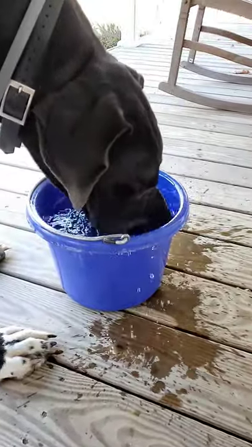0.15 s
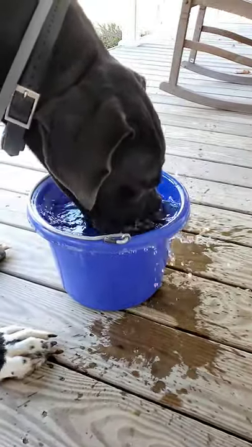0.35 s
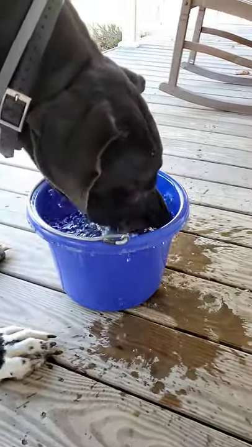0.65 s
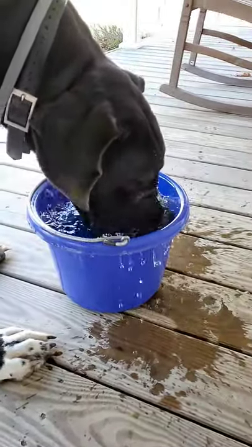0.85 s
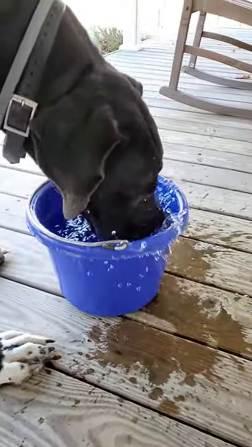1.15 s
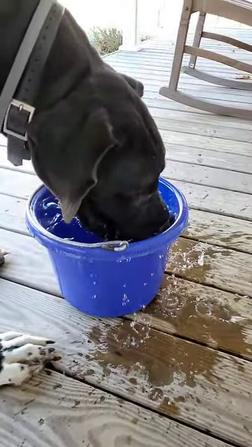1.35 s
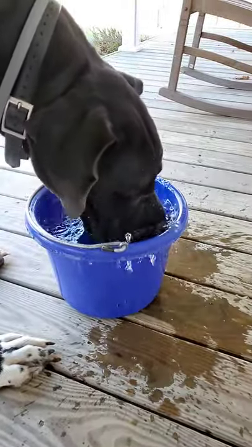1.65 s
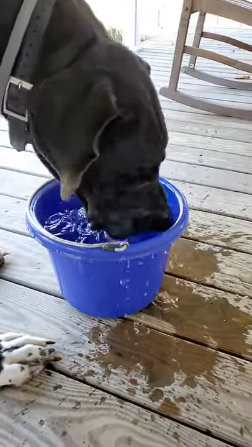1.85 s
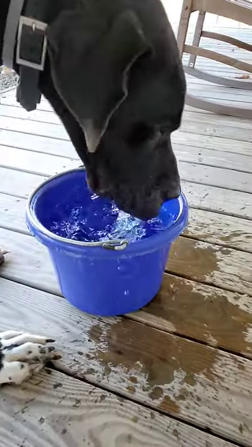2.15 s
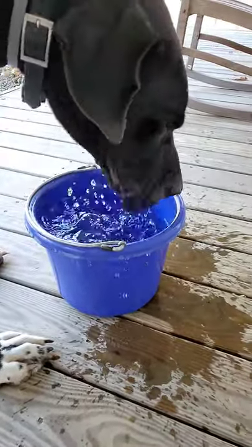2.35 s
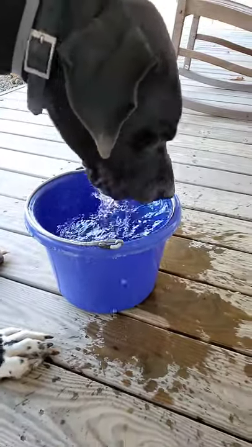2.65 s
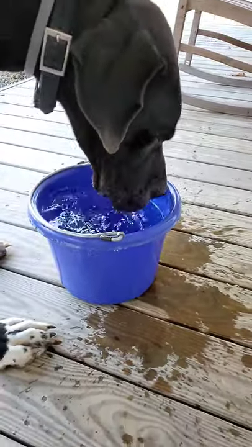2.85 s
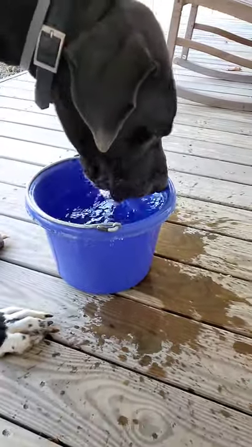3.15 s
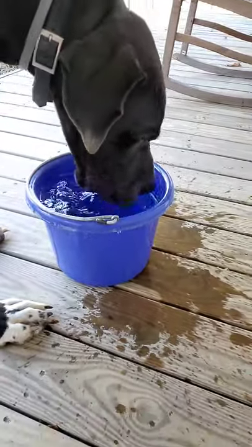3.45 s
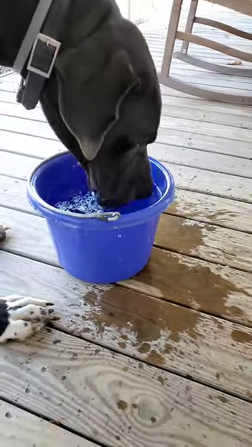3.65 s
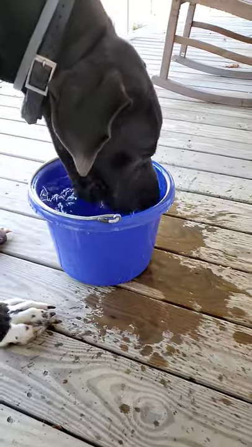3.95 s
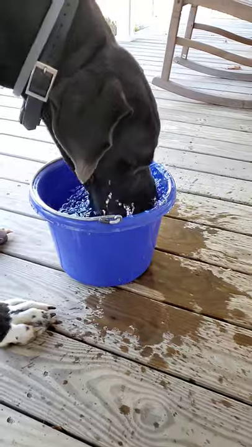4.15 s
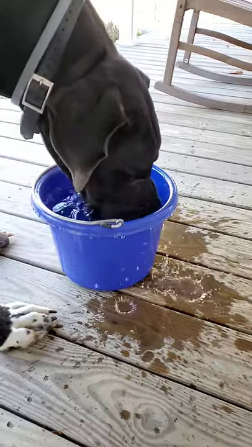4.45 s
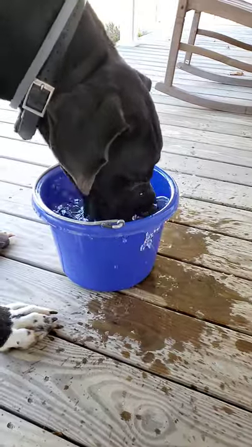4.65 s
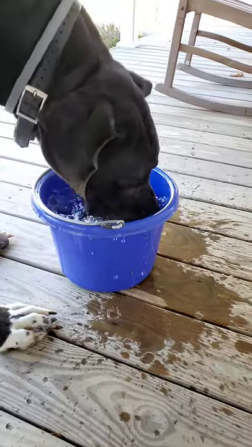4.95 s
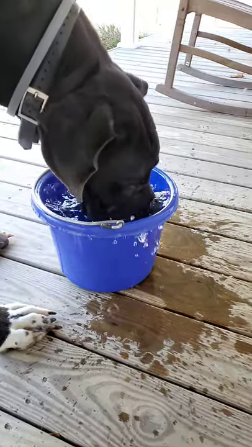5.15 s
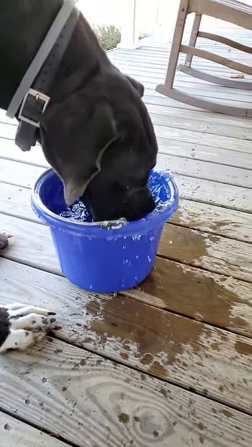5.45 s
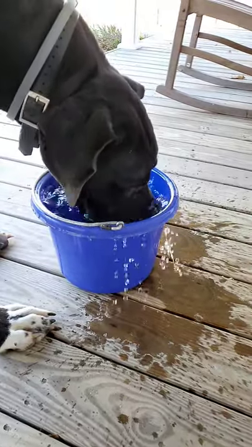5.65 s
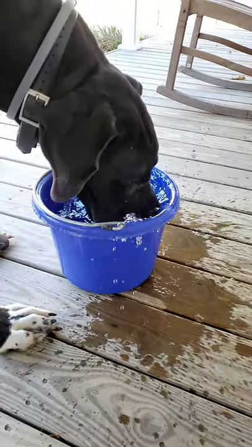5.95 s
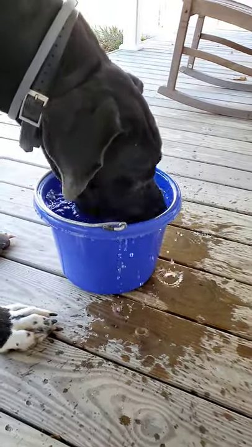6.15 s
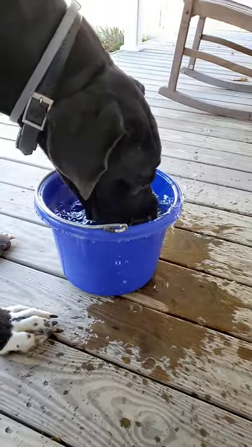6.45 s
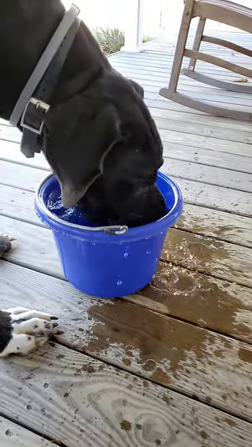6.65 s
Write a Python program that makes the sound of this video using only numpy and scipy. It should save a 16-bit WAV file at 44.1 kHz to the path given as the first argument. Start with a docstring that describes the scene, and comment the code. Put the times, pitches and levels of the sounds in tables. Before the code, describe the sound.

Close stereo sound of sloppy lapping in a water-filled bucket, with slightly hollow resonance and a short porch reflection. Steady splashing strokes mix tongue smacks, squeaky clicks, bubbling slosh and low gulps. Midway the strokes stop and water patters and trickles off the jowls; then a heavy splash restarts the drinking, which continues to the end. Low bumps sound once near the end, over quiet distant hum and air.

```python
"""Dog lapping from a bucket

A large dog laps water from a plastic bucket on a wooden porch, about two laps a second, and dribbles in a pause.
Laps are wet smacks (click runs with squeaks), slosh (bubbles and froth) and spray (fizz and ticks).
Damped tones make the plops, deep gulps and dull bumps; wavering low tones hum in the distance over air noise.
"""
import sys
import numpy as np
from scipy import signal
from scipy.fft import rfft, irfft, next_fast_len
from scipy.io import wavfile
from scipy.ndimage import uniform_filter1d

SR = 44100
rng = np.random.default_rng(int(sys.argv[2]) if len(sys.argv) > 2 else 0)


def digitize_waveform(pressure):
    """Quantize a signal to 16-bit integers and store it at the path in sys.argv[1].

    Rows of a 2-D input are taken as channels; values are limited to [-1, 1].
    """
    field = np.atleast_2d(pressure).T
    bounded = np.clip(field, -1, 1)
    quanta = np.round(bounded * 32767).astype(np.int16)
    wavfile.write(sys.argv[1], SR, quanta)


N = 300306
TIME = np.arange(N) / SR

# Levels in the tables are relative, ahead of the layer gains.
# Background air spectrum. Each row: frequency in Hz, relative density in dB.
AIR_SPECTRUM = [(20, -16), (36, -4), (52, -6), (90, 3), (200, -5.5), (270, -13.5), (450, -14.5),
                (720, -19.5), (1400, -30.5), (2500, -38.5), (6200, -27), (9000, -37.5), (11600, -30.5),
                (16000, -37)]
# Pitch of the main machine hum. Each row: time in seconds, pitch in Hz.
HUM_PITCH = [(0, 66), (1.5, 65.5), (2.8, 66), (4.2, 66), (6.81, 65)]
# Its tones. Each row: multiple of the pitch, middle level in dB rms.
HUM_TONES = [(1, -43), (1.57, -48), (2, -46), (2.69, -55.5), (3.14, -53), (5, -61.5)]
# Second hum, sinking in pitch and uneven in level. Each row: time in seconds, pitch in Hz, level in dB rms.
SINKING_HUM = [(0, 78.0, -41), (1.5, 77.85, -46), (2.8, 73.7, -40.5), (3.8, 71.4, -48), (6.81, 73.77, -45)]
# Dull bumps on bucket and boards. Each row: start in seconds, pitch in Hz, peak in dB, T60 in seconds.
BUMPS = [(5.553, 97.6, -11, 0.12), (5.595, 118.3, -21, 0.24), (5.612, 57.4, -23, 0.45),
         (5.739, 133.7, -16.5, 0.068), (5.765, 72.94, -22.5, 0.14), (5.82, 66.76, -25, 0.096)]
# Bucket resonances. Each row: frequency in Hz, width in Hz, gain in dB.
BUCKET_MODES = [(716, 75, 0.5), (2014, 29, -3.5), (2840, 60, -27)]
# Deep gulps, where the tongue's cavity closes. Each row: start in seconds, initial pitch in Hz, peak in dB.
GULPS = [(0.581, 277, -28.5), (1.938, 184, -28.5), (2.313, 174.5, -30.5), (2.316, 265, -32),
         (3.274, 275, -28.5), (3.599, 180.5, -25.5), (3.921, 208.4, -26), (4.095, 278, -28),
         (4.114, 174.1, -24), (4.415, 200, -20.5), (4.52, 186.8, -28), (4.59, 400, -34.5), (5.16, 273, -31),
         (5.3, 226, -32.5), (6.035, 297, -32.5), (6.152, 240.7, -33.5), (6.559, 200.4, -28)]
# Large bubbles trapped by the tongue or falling drops.
# Each row: start in seconds, initial pitch in Hz, peak in dB, T60 in seconds.
PLOPS = [(.035, 975, -21, 0.03), (.138, 1140, -20, 0.018), (.548, 943, -17.5, 0.032),
         (.556, 1707, -17.5, .045), (.585, 1110, -15.5, 0.024), (0.664, 1326, -19.5, 0.026),
         (1.038, 877, -19.5, 0.047), (1.457, 863, -18, 0.019), (1.544, 2070, -16.5, 0.018),
         (1.866, 2730, -20, 0.027), (1.871, 913, -14.5, 0.025), (1.937, 976, -22, 0.032),
         (2.223, 675, -21.5, 0.024), (2.527, 1520, -32, 0.032), (2.552, 3096, -26, 0.032),
         (2.566, 5660, -24.5, 0.011), (2.603, 2417, -27, 0.02), (2.61, 980, -23.5, 0.044),
         (2.68, 610, -27, .025), (3.012, 4570, -30.5, 0.013), (3.033, 2833, -22, 0.032),
         (3.073, 1720, -27.5, 0.029), (3.107, 890, -27, 0.043), (3.138, 1860, -29.5, 0.026),
         (3.158, 3455, -27.5, .016), (3.277, 576.5, -24.5, 0.061), (3.286, 566, -22, 0.043),
         (3.34, 2857, -32, .02), (3.545, 1060, -23, .023), (3.659, 524, -25, 0.027),
         (3.918, 2742, -20.5, 0.014), (3.922, 2076, -16, 0.015), (3.975, 2840, -19, .022),
         (4.019, 957, -25, .05), (4.09, 690, -19, 0.022), (4.105, 710.5, -21, 0.042),
         (4.131, 1002, -23, .03), (4.446, 1065, -15, .023), (4.938, 2977, -21.5, 0.035),
         (5.023, 1158, -19, .013), (5.351, 1220, -22.5, 0.018), (6.252, 952, -21.5, .03),
         (6.439, 973, -21, 0.038), (6.675, 713, -21.5, 0.033)]
# Jaws pressing out a last mouthful. Each row: start in seconds, length in seconds, level in dB.
SLURPS = [(.447, 0.079, -34.5), (1.341, 0.086, -33), (5.699, .075, -32.5), (6.59, 0.057, -34)]
# Water off the jowls or against the bucket wall. Each row: time in seconds, slosh in dB, spray in dB.
SPILLS = [(0.31, -49, -48.5), (0.778, -50, -63), (0.848, -55, -55.5), (1.11, -45, -57),
          (1.666, -50.5, -46.0), (2.121, -44.5, -38.0), (2.189, -35, -41.5), (2.373, -33.0, -26),
          (2.54, -38.0, -33), (2.601, -37.5, -39), (2.679, -42.5, -35.5), (2.77, -40.5, -35.0),
          (2.8, -38.5, -47), (3.028, -40.5, -40.5), (3.074, -38.5, -44.0), (3.104, -36.0, -37),
          (3.134, -42.5, -35), (3.176, -44, -38), (3.222, -57, -40.5), (3.278, -35, -41.5),
          (3.346, -46, -51), (3.433, -45, -44), (3.518, -45, -49.5), (3.806, -42.5, -49.5),
          (4.185, -43.0, -39.5), (4.58, -42.5, -52.5), (4.692, -54, -54), (4.882, -41, -44),
          (5.48, -46.0, -49.0), (6.014, -40, -42.5), (6.42, -40.5, -45.0)]
# Laps, from the tongue's plunge until the lifted water falls back.
# Each row: end of attack in seconds, length in seconds, attack in seconds, release in seconds,
# slosh in dB, spray in dB, depth of the mid-lap lull in dB.
LAPS = [(0.08, 0.078, 0.081, 0.14, -34.0, -33.5, 3.0), (0.556, 0.12, 0.038, 0.11, -36.0, -33.5, 4.0),
        (0.956, 0.094, 0.061, 0.075, -35.0, -31.0, 3.0), (1.44, 0.11, 0.055, 0.09, -35.0, -32.0, 6.0),
        (1.812, 0.19, 0.053, 0.18, -33.5, -33.0, 3.0), (2.228, 0.078, 0.066, 0.076, -37.5, -31.0, 4.0),
        (3.573, 0.1, 0.11, 0.066, -40.0, -37.0, 5.0), (3.925, 0.18, 0.034, 0.12, -31.0, -33.0, 2.0),
        (4.377, 0.14, 0.014, 0.073, -34.0, -32.5, 2.0), (4.929, 0.096, 0.15, 0.122, -34.0, -34.5, 4.5),
        (5.294, 0.098, 0.058, 0.055, -31.0, -30.5, 4.0), (5.788, 0.11, 0.058, 0.084, -36.0, -32.5, 6),
        (6.186, 0.086, 0.094, 0.12, -33.5, -32, 3), (6.654, 0.11, 0.15, 0.087, -38.0, -32, 2.5)]
# Muzzle lifted clear of the water. Each row: time in seconds, share from 0 to 1.
MUZZLE_LIFT = [(2.3, 0.07), (2.5, 1), (3.6, 1), (3.85, 0.11)]
# Slosh spectrum. Each row: frequency in Hz, relative density in dB.
SLOSH_SPECTRUM = [(50, -30), (150, -27.5), (300, -6.5), (480, -7), (700, -1), (1100, 3.5), (1450, -4),
                  (2100, -5), (3000, -10.5), (4500, -37), (8000, -43)]
# Spray and smack-click spectrum. Each row: frequency in Hz, relative density in dB.
SPRAY_SPECTRUM = [(1200, -16.5), (2500, -7.5), (4000, -4.5), (5200, -5.5), (6200, -2.5), (7400, -5),
                  (8700, -6), (10200, -6), (11600, -3.5), (13500, -9.5), (16000, -9.5)]
# Smacks of tongue and lips.
# Each row: start in seconds, level in dB, nominal squeak pitch in Hz, squeak level re the smack in dB.
SMACKS = [(.087, -16, 6200, -3), (0.445, -23.5, 5620, 0.5), (0.4852, -14.5, 6080, -4),
          (0.5053, -25, 6160, 10.5), (.551, -18.5, 6430, -4), (.5788, -8.5, 6380, -15),
          (0.9683, -29, 6660, 3.5), (0.9945, -20.5, 6230, 2.5), (1.1882, -22.5, 6164, -4),
          (1.345, -19.5, 5640, -4), (1.543, -7, 6450, -13), (1.832, -24, 6036, 7.5),
          (1.9252, -12, 5680, -8), (1.9808, -8.5, 6380, -16), (2.2334, -11, 5480, -10.5),
          (2.262, -14, 6330, -18), (2.3797, -13, 4710, -7.5), (2.45, -26, 6350, -3.5),
          (2.4961, -19, 4520, -14.5), (2.6263, -16, 6105, -15), (2.6759, -13, 6150, -12),
          (2.71, -12, 6686, -9.5), (2.768, -20.5, 6470, -3), (2.984, -28, 5974, -3.5),
          (3.49, -24.5, 7747, -10.5), (3.9366, -7.5, 2278, -17), (4.008, -15.5, 5490, -11),
          (4.031, -9, 3440, -11.5), (4.077, -16, 6064, -12.5), (4.371, -15, 6604, -13.5),
          (4.38, -13, 6270, -4.5), (4.406, -10.5, 5660, -10.5), (4.4921, -17.5, 5200, -4),
          (4.5026, -14, 6182, -6), (4.932, -11.5, 6480, -3), (4.9387, -13, 4073, -2.5),
          (5.011, -16, 7870, -8), (5.3847, -18.5, 5684, -3.5), (5.64, -27.5, 6455, 2.5),
          (5.6552, -23, 6070, 3.5), (5.7012, -15.5, 5990, 2), (5.786, -14, 6910, -6),
          (5.893, -14, 6490, -4.5), (6.179, -10.5, 7050, -12.5), (6.1939, -14.5, 5947, -2.5),
          (6.2412, -17.5, 6676, -0.5), (6.582, -22, 5860, -4), (6.6075, -12.5, 5897, -4),
          (6.66, -10.5, 6994, -19), (6.6753, -9.5, 6746, -7.5), (6.7716, -15.5, 7060, -6)]
# Microphone ports. Each row: frequency in Hz, left minus right in dB.
PORT_DIFFERENCE = [(60, -2), (300, -2), (450, -3), (800, 1.5), (1300, -3.5), (1850, 0.5), (2900, -3.5),
                   (4200, -8), (5400, -15), (6300, -16), (7500, -13.5), (8800, -3.5), (11500, -4),
                   (14000, 1.5)]

RIGHT_PORT_LAG_S, CUTOFF_HZ = 55e-6, 15550
GULP_CYCLES = 12.7  # T60 in cycles of the initial pitch
SLURP_RISE_DB_PER_S, SLURP_FALL_DB_PER_S = 2500, 600
SLURP_SLOSH_DB, SLURP_SPRAY_DB = -15, -7  # water stirred, re the slurp
SPILL_RISE_DB_PER_S, SPILL_FALL_DB_PER_S = 1800, 260
REST_SLOSH_DB, REST_SPRAY_DB = -64.5, -62
RAMP_DB = 30  # range covered in a lap's attack or release time
SLOSH_GROWTH_DB, SPRAY_GROWTH_DB = 1.5, -0.5  # change from plunge to fall-back
SETTLE_DB, SETTLE_DB_PER_S = -19, 55  # waves left by a lap
CHURN_DB, CHURN_PER_S = 2, 70  # uneven surge, independent for slosh and spray
FROTH_DB, TICKS_DB, WASH_DB = -4.5, 2.5, 4
SMACK_T60_S, SMACK_T60_SPREAD = 0.036, 0.17  # spread in log units


def from_db(db):
    """Decibels to gain."""
    return 10 ** (np.asarray(db) / 20)


def rms_one(x):
    """Scale to unit rms."""
    return x / np.sqrt(np.mean(x ** 2) + 1e-20)


def in_time(rows):
    """Interpolate the columns of a timed table at every sample."""
    s, *columns = np.transpose(rows)
    return [np.interp(TIME, s, column) for column in columns]


def gain_at(points, hz):
    """Read a (Hz, dB) table as gain on a log-frequency axis."""
    f, db = np.transpose(points)
    return from_db(np.interp(np.log(np.maximum(hz, 1)), np.log(f), db))


def coloured(x, points):
    """Filter to a smooth spectrum, keeping the power of white noise."""
    size = next_fast_len(x.shape[-1] + 1024)
    gain = gain_at(points, np.fft.rfftfreq(size, 1 / SR))
    return irfft(rfft(x, size) * rms_one(gain), size)[..., :x.shape[-1]]


def resonate(x, hz, width_hz):
    """Two-pole resonance with about unit gain on top."""
    r = np.exp(-np.pi * width_hz / SR)
    b = np.array([1, 0, -1]) * (1 - r * r) / 2
    a = [1, -2 * r * np.cos(2 * np.pi * hz / SR), r * r]
    return signal.lfilter(b, a, x + 1e-18)


def add(track, s, sound):
    """Mix a short sound into a track at a time in seconds."""
    start = min(max(int(s * SR), 0), N)
    track[:, start:start + sound.shape[-1]] += sound[..., :N - start]


def drift(per_s):
    """Random wander through knots of unit spread."""
    knots = rng.standard_normal(4096)
    return np.interp(TIME * per_s, np.arange(len(knots)), knots)


def clicks(per_s, spread_db, size):
    """Random impulses, many small and a few large."""
    db = spread_db * np.minimum(rng.exponential(1, size), 4)
    sizes = from_db(db) * rng.choice([-1, 1], size)
    return sizes * (rng.random(size) < per_s / SR)


def evened(x, window_s):
    """Level a texture over a window while its fast grain stays."""
    power = uniform_filter1d(np.mean(x ** 2, axis=0), int(window_s * SR) + 1)
    return x / np.sqrt(np.abs(power) + np.mean(power) / 100)


def scattered(ticks, decay_s, wet_db):
    """Each click gets a brief noise wash off walls and waves, independent at each port."""
    keep = np.exp(-1 / (decay_s * SR))
    wash = np.sqrt(signal.lfilter([1 - keep], [1, -keep], ticks ** 2 + 1e-18))
    return rms_one(ticks + from_db(wet_db) * wash * rng.standard_normal((2, len(ticks))))


def ringing(table, swell_s, rise, phase_spread):
    """Damped tones climbing by the share 'rise' over T60; reflections shift the phase at each port."""
    out = np.zeros((2, N))
    for s, hz, db, t60 in table:
        t = TIME[:int(max(t60, .001) * SR + 2 * swell_s * SR)]
        shape = (1 - np.exp(-(t / swell_s) ** 2)) * np.exp(-np.log(1000) * t / t60)
        phase = 2 * np.pi * hz * (t + rise * t * t / (2 * t60))
        port_phase = phase_spread * rng.standard_normal((2, 1))
        add(out, s, from_db(db) * shape / shape.max() * np.sin(phase + port_phase))
    return out


def bubble_cloud(per_s, spread_db, low_hz, high_hz, cycles, rise):
    """Bubbles born at random, each ringing for some cycles at the pitch of its size."""
    born = np.flatnonzero(rng.random(N) < per_s / SR)
    size, strength, damping = rng.random((3, N))[:, born]
    hz = low_hz * (high_hz / low_hz) ** size
    db = -spread_db * np.log(strength + .02) + 20 * np.log10(hz / low_hz)
    t60 = cycles * (.5 + damping) / hz
    bubbles = zip(born / SR, hz, db, t60)
    return rms_one(ringing(bubbles, swell_s=0.0001, rise=rise, phase_spread=0.83))


def hold_db(start_s, end_s, rise_db_per_s, fall_db_per_s):
    """Attack up to start_s, hold, release from end_s, in dB re the hold."""
    before = rise_db_per_s * np.maximum(start_s - TIME, 0)
    after = fall_db_per_s * np.maximum(TIME - end_s, 0)
    return -np.minimum(before + after, 100)


def echoes(x, t60, delay_s, dull_hz):
    """Dense decaying reflections, low-passed and different at each port."""
    t = TIME[:SR // 2]
    tail = rng.standard_normal((2, len(t))) * from_db(-60 * t / t60) * (t > delay_s)
    tail /= np.sqrt(np.sum(tail ** 2, axis=1, keepdims=True))
    pole = np.exp(-2 * np.pi * dull_hz / SR)
    tail = signal.lfilter([1 - pole], [1, -pole], tail)
    return signal.fftconvolve(x[None], tail, axes=1)[:, :N]


def outdoor_air():
    """Noise whose rumble is alike at both ports and whose faint hiss is unlike."""
    mid, side = coloured(rng.standard_normal((2, N)), AIR_SPECTRUM)
    side = side - 0.74 * signal.sosfilt(signal.butter(1, 600, fs=SR, output="sos"), side)
    return from_db(-43) * (mid + side * [[1], [-1]])


def hum():
    """Distant machines: wavering low tones and one sinking tone."""
    pitch, = in_time(HUM_PITCH)
    phase = 2 * np.pi * np.cumsum(pitch * (1 + 0.004 * drift(2.94))) / SR
    tones = np.zeros(N)
    for multiple, db in HUM_TONES:
        level = from_db(db + 2.05 * drift(2.477))
        tones += level * np.sin(multiple * phase + rng.uniform(0, 2 * np.pi))
    hz, db = in_time(SINKING_HUM)
    sinking = from_db(db) * np.sin(2 * np.pi * np.cumsum(hz) / SR)
    return np.sqrt(2) * (tones + sinking)  # rms to peak


def bumps():
    """Bucket and boards ring as damped low tones of steady pitch."""
    return ringing(BUMPS, swell_s=0.0022, rise=0, phase_spread=0.061)


def bucket_resonance(water):
    """The bucket's modes ring with the water sound."""
    return sum(from_db(db) * resonate(water, hz, width_hz) for hz, width_hz, db in BUCKET_MODES)


def gulps():
    """The tongue's closing cavity rings low, rising slightly."""
    table = [(s, hz, db, GULP_CYCLES / hz) for s, hz, db in GULPS]
    return ringing(table, swell_s=0.0012, rise=0.075, phase_spread=0.14)


def plops():
    """Single large bubbles ring, rising slightly."""
    return ringing(PLOPS, swell_s=0.0014, rise=0.057, phase_spread=0.56)


def plop_splashes(t60, breadth):
    """The surface breaks as a bubble forms: a brief splash, broad around the bubble's pitch."""
    out, t = np.zeros((2, N)), TIME[:SR // 10]
    for s, hz, db, _ in PLOPS:
        breaking = scattered(clicks(4000, 2.7, len(t)), decay_s=0.0014, wet_db=15.0)
        burst = rms_one(resonate(breaking, hz, breadth * hz))
        add(out, s, from_db(db) * burst * np.exp(-np.log(1000) * t / t60))
    return out


def slurp_level():
    """Slurp level in dB, the strongest at each moment."""
    levels = [db + hold_db(s, s + length_s, SLURP_RISE_DB_PER_S, SLURP_FALL_DB_PER_S)
              for s, length_s, db in SLURPS]
    return np.max(levels, axis=0)


def slurps(level_db):
    """Air squeezed through wet lips bursts in tiny, squeaky, rising bubbles."""
    fizz = bubble_cloud(900, spread_db=5.5, low_hz=3530, high_hz=7230, cycles=46, rise=0.08)
    return from_db(level_db) * evened(fizz, window_s=.06)


def stirring(slurp_db):
    """Slosh and spray levels in dB: laps plunge, lull, fall back and settle; slurps and spills add."""
    rest = from_db([[REST_SLOSH_DB], [REST_SPRAY_DB]])
    slurped = from_db(slurp_db + [[SLURP_SLOSH_DB], [SLURP_SPRAY_DB]])
    power = rest ** 2 + slurped ** 2
    for s, length_s, attack_s, release_s, slosh_db, spray_db, lull_db in LAPS:
        end_s = s + length_s
        rise, fall = RAMP_DB / max(attack_s, .002), RAMP_DB / max(release_s, .002)
        progress = np.clip((TIME - s) / length_s, 0, 1)
        growth = (progress - .5) * [[SLOSH_GROWTH_DB], [SPRAY_GROWTH_DB]]
        lull = lull_db * np.sin(np.pi * progress) ** 2
        stroke = from_db(hold_db(s, end_s, rise, fall) - lull + growth)
        waves = from_db(SETTLE_DB + hold_db(s, end_s, rise, SETTLE_DB_PER_S))
        power += from_db([[slosh_db], [spray_db]]) ** 2 * (stroke ** 2 + waves ** 2)
    for s, slosh_db, spray_db in SPILLS:
        burst = from_db(hold_db(s, s, SPILL_RISE_DB_PER_S, SPILL_FALL_DB_PER_S))
        power += from_db([[slosh_db], [spray_db]]) ** 2 * burst ** 2
    churn = CHURN_DB * np.array([drift(CHURN_PER_S), drift(CHURN_PER_S)])
    return 10 * np.log10(power) + churn


def spray(level_db, lift):
    """Droplets tick on the water and tiny bubbles fizz; a lifted muzzle sheds fewer drops."""
    per_s = 1100 * from_db(.35 * (level_db + 36) - 4 * lift)
    fizz = bubble_cloud(per_s, spread_db=3.5, low_hz=1400, high_hz=8000, cycles=38, rise=.05)
    ticks = scattered(clicks(.8 * per_s, 4.0, N), decay_s=.003, wet_db=WASH_DB)
    mix = fizz + from_db(TICKS_DB) * ticks
    return from_db(level_db + 2.5) * evened(coloured(mix, SPRAY_SPECTRUM), window_s=0.18)


def slosh(level_db, lift):
    """Churned water traps bubbles, the more the harder it is stirred; a dribble makes fewer."""
    per_s = 500 * from_db(.35 * (level_db + 38) - 2 * lift)
    bubbles = bubble_cloud(per_s, spread_db=4.0, low_hz=228.0, high_hz=4254, cycles=52, rise=0.31)
    froth = scattered(clicks(1200, 7.5, N), decay_s=0.0088, wet_db=WASH_DB)
    mix = bubbles + from_db(FROTH_DB) * froth
    return from_db(level_db + 0.43) * evened(coloured(mix, SLOSH_SPECTRUM), window_s=0.022)


def smacks():
    """A water film tears in a run of clicks; the shrinking air pocket behind squeaks roughly upward."""
    crack, squeak, t = np.zeros((2, N)), np.zeros((2, N)), TIME[:SR // 10]
    for s, db, hz, squeak_db in SMACKS:
        t60 = SMACK_T60_S * np.exp(SMACK_T60_SPREAD * rng.uniform(-1, 1))
        fade = from_db(db - 60 * t / t60)
        tear = clicks(9000, 2.5, len(t))
        add(crack, s, scattered(tear, decay_s=.002, wet_db=5) * fade)
        roughness = 0.15 * rng.standard_normal((2, len(t)))
        pitch = hz * (1.1 - 0.317 * np.exp(-t / 0.00306) + roughness)
        onset = 1 - np.exp(-t / 0.0024)
        tone = np.sin(2 * np.pi * np.cumsum(pitch, axis=1) / SR)
        add(squeak, s, from_db(squeak_db) * fade * onset * tone)
    return from_db(-7) * coloured(crack, SPRAY_SPECTRUM) + from_db(5.5) * squeak


def scene():
    """Water sounds inside the bucket, the bucket under the porch roof, air and machines beyond."""
    background = outdoor_air() + hum()
    slurp_db = slurp_level()
    slosh_db, spray_db = stirring(slurp_db)
    lift = np.clip(in_time(MUZZLE_LIFT)[0], 0, 1)
    water = slosh(slosh_db, lift) + spray(spray_db, lift) + slurps(slurp_db) + smacks()
    water = water + from_db(-8) * plop_splashes(t60=0.055, breadth=0.14)
    water = water + bucket_resonance(water)
    near = water + from_db(-2.2) * plops() + from_db(1.5) * gulps()
    porch = from_db(-6.0) * echoes(near.mean(axis=0), t60=0.17, delay_s=0.006, dull_hz=7000)
    return background + bumps() + near + porch


def record(dry):
    """The right port hears later and stronger in the treble, the left is shaded; both ends are cut."""
    size = next_fast_len(N + SR // 10)
    hz = np.fft.rfftfreq(size, 1 / SR)
    ratio = gain_at(PORT_DIFFERENCE, hz)
    lag = np.exp(-2j * np.pi * hz * RIGHT_PORT_LAG_S)
    ports = np.array([ratio, lag]) * 2 / (1 + ratio)
    lean = signal.sosfilt(signal.butter(3, 44, "high", fs=SR, output="sos"), dry)
    low_pass = 1 / np.sqrt(1 + (hz / CUTOFF_HZ) ** 200)
    return irfft(rfft(lean, size) * ports * low_pass, size)[:, :N]


dry = scene()
out = record(dry)
digitize_waveform(out)
```